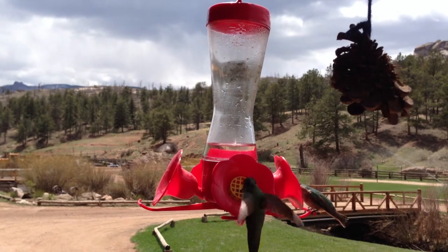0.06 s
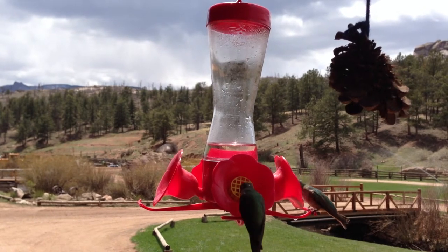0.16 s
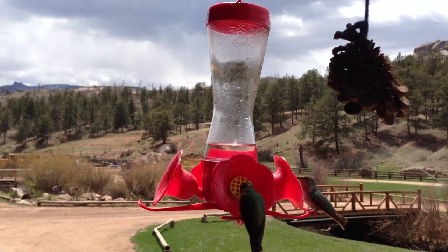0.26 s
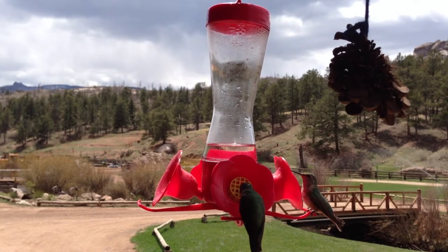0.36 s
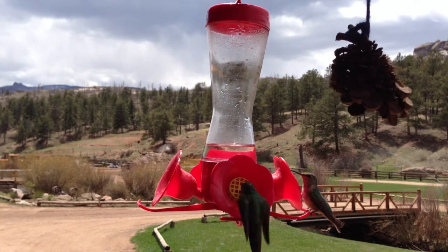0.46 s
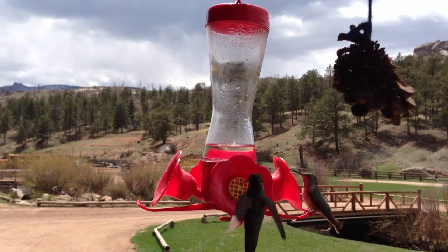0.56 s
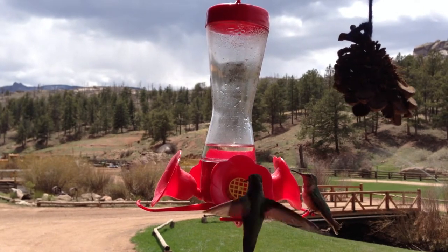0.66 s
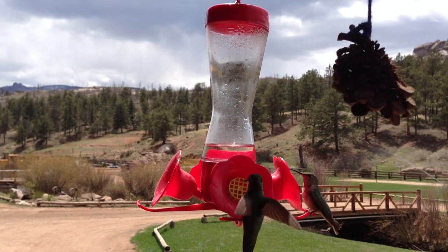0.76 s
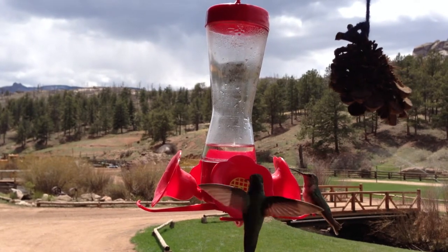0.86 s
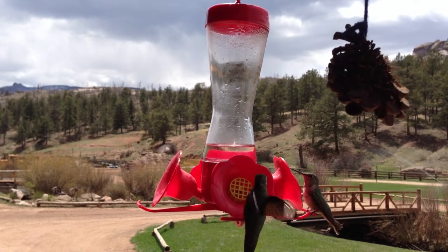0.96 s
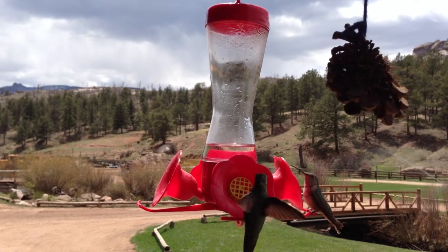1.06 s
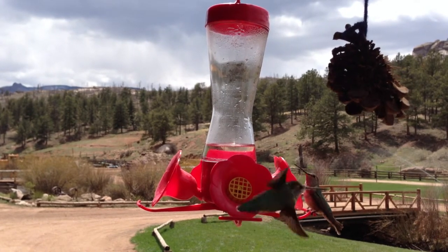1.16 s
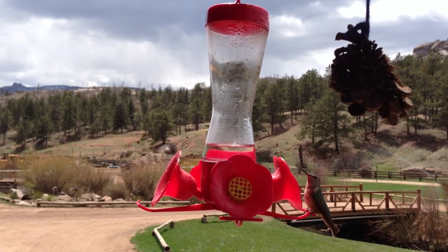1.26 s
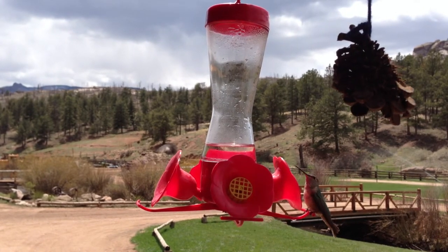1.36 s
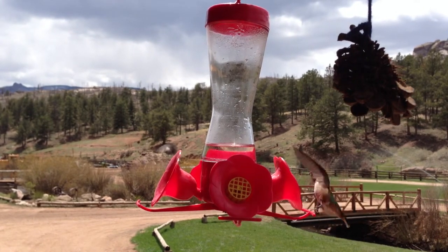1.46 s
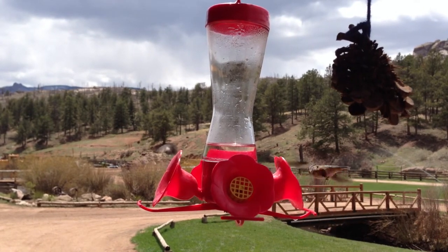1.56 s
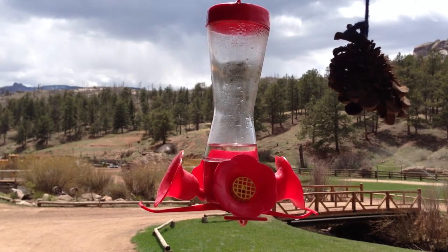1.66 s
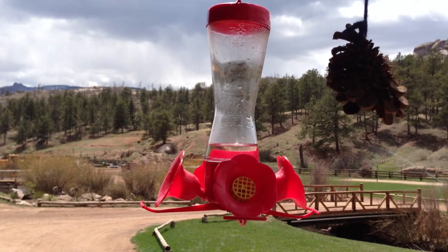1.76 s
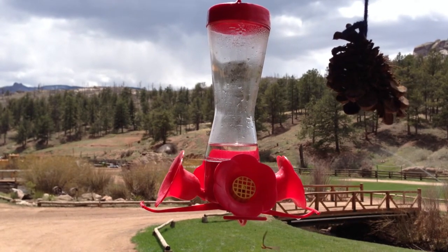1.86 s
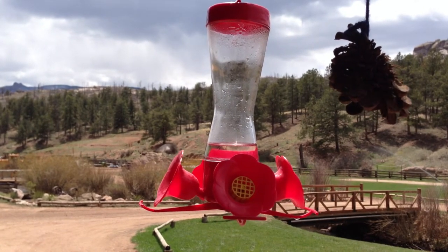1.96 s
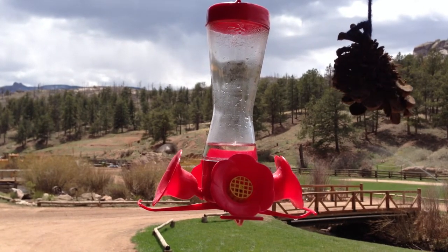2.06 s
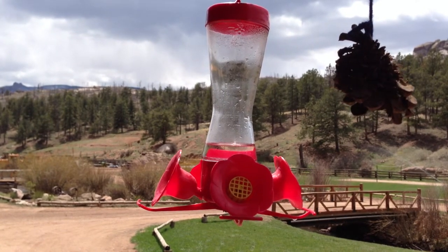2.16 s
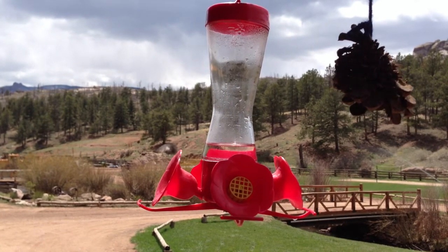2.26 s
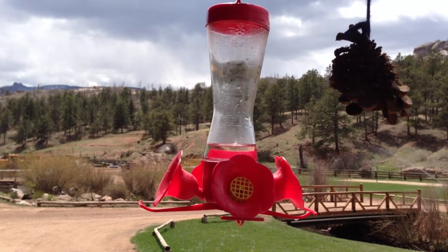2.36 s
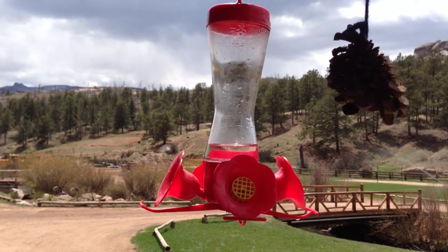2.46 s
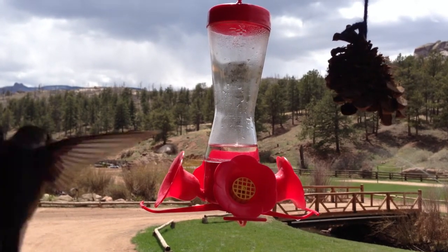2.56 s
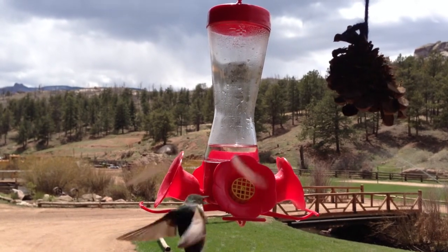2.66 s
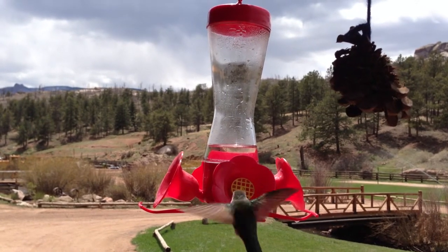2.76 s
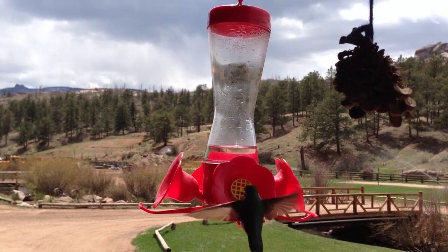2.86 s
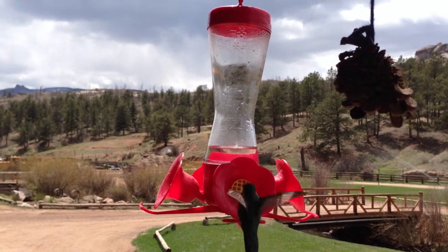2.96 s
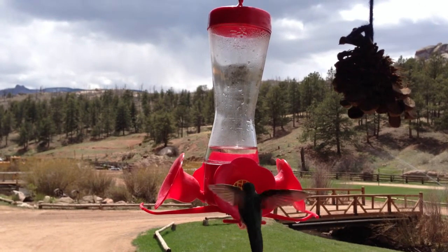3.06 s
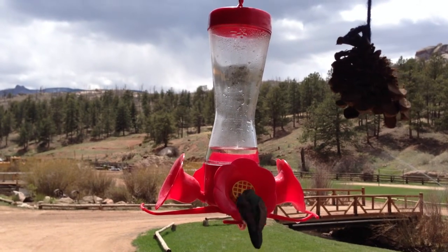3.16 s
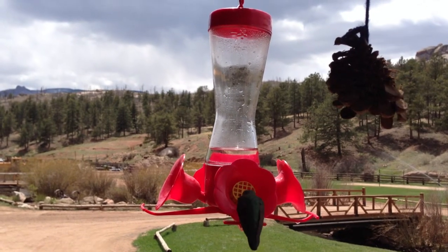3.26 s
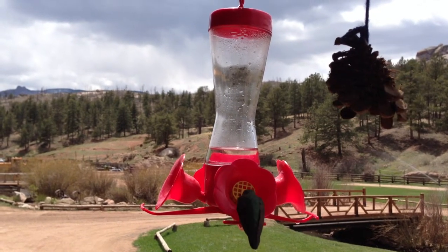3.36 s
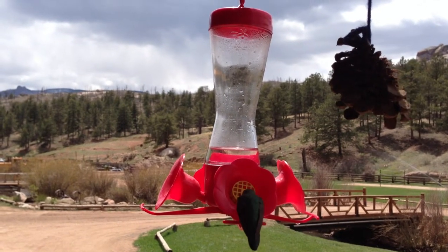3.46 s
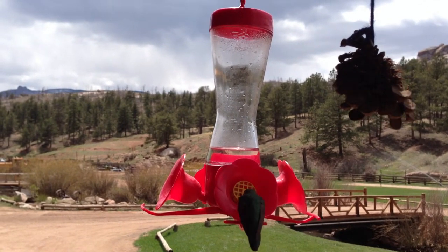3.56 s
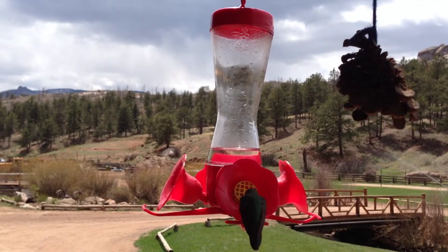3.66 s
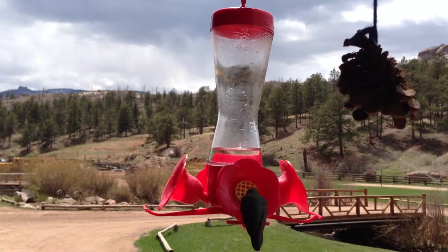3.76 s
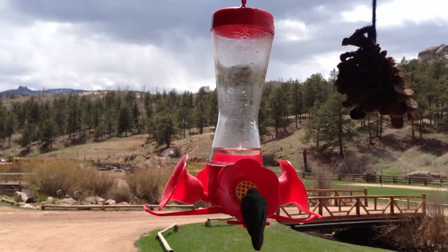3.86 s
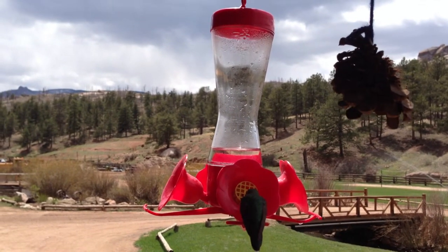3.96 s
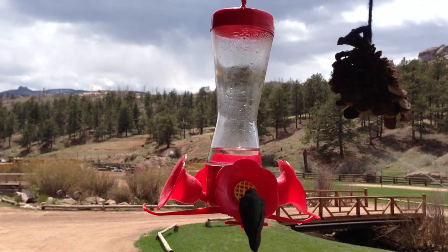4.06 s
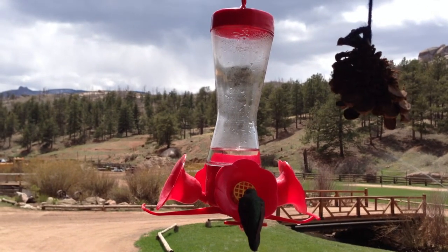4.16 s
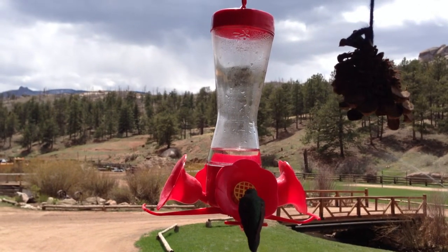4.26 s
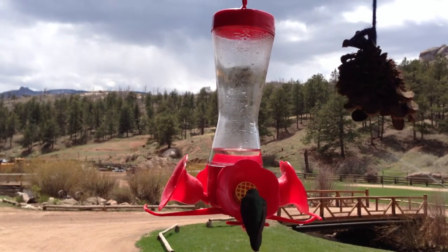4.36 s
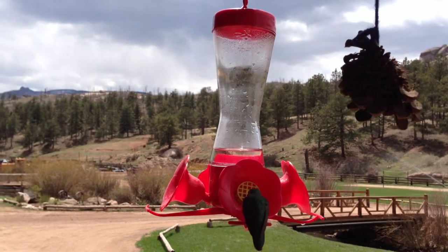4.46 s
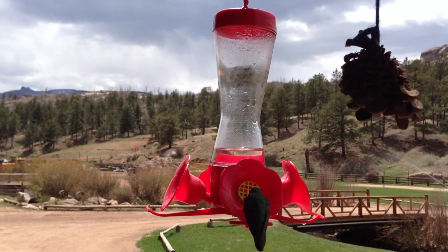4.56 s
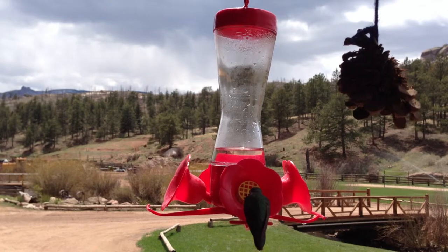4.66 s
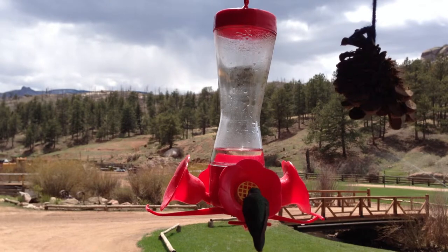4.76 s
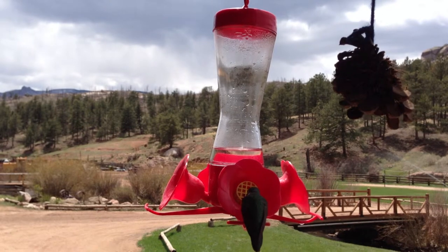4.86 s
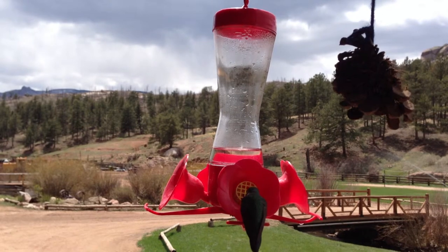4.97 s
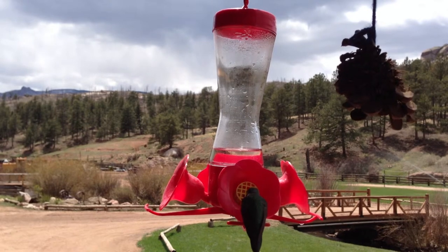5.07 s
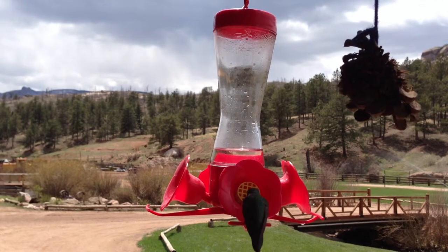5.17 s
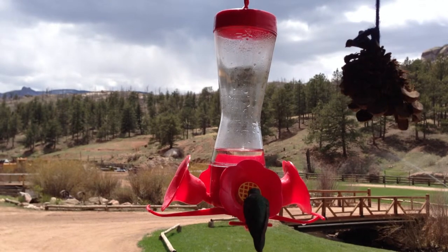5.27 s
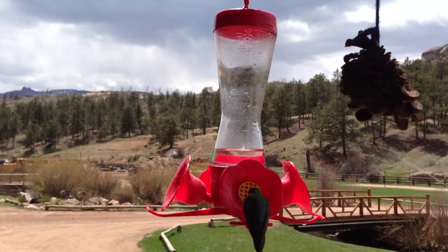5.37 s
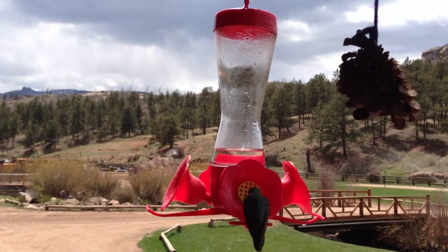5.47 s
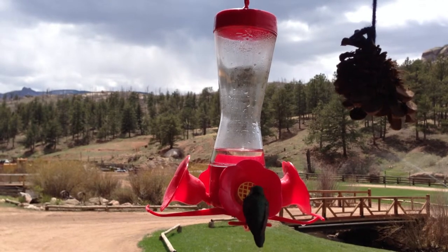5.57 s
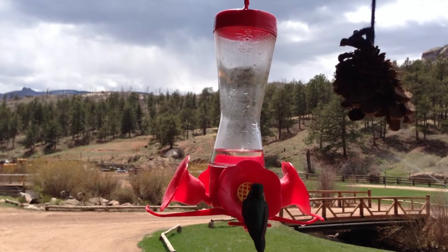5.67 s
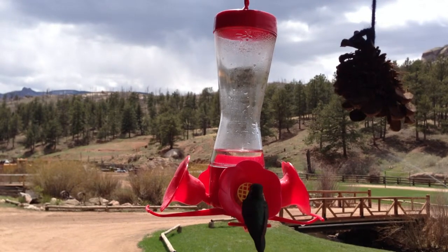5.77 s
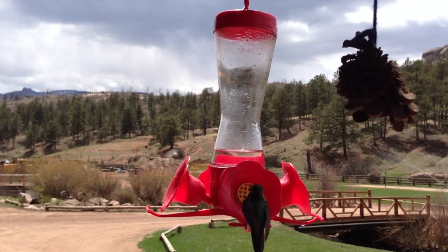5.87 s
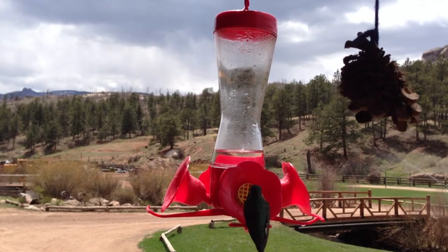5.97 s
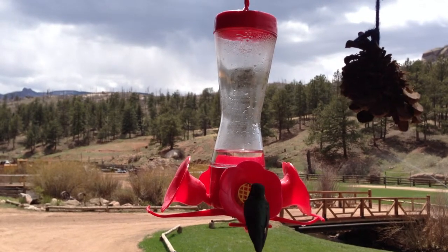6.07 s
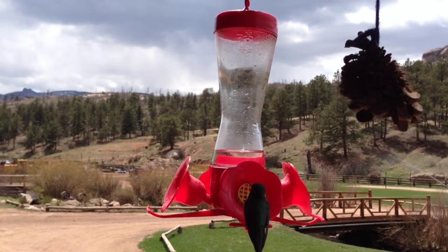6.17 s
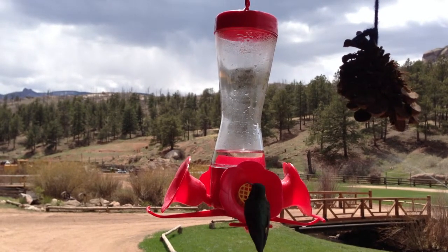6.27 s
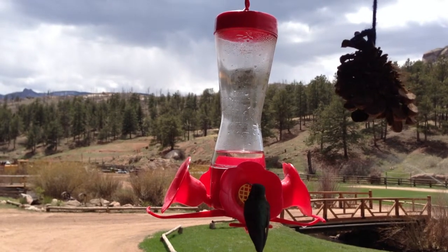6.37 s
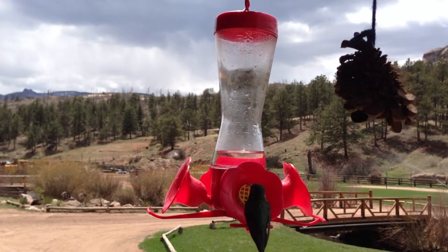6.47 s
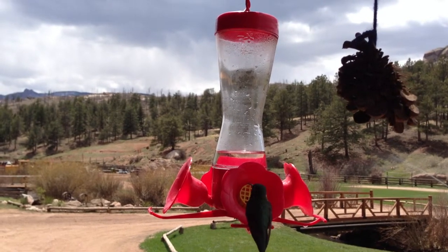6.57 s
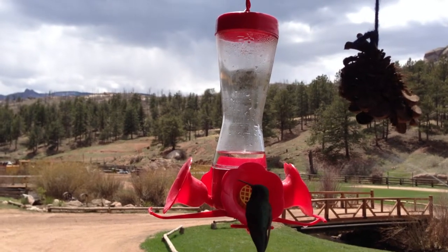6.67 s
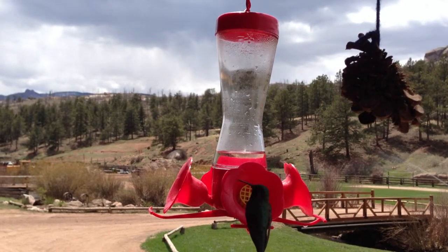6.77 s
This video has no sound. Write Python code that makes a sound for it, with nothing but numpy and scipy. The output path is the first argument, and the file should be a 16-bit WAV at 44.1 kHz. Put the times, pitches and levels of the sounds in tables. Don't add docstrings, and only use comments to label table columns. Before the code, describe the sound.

A small microphone close to a hummingbird feeder in open, wooded country picks up high rattling wing trills with low whirring beneath. Passes build to a take-off with a chip and hard tick, then a still louder landing flurry at under three seconds. Afterwards it is quiet: breeze, hiss, faint echoing chips and wavering trills of distant hummingbirds, one swelling nearer before fading.

```python
import sys
import numpy as np
from scipy import signal
from scipy.fft import rfft, irfft, next_fast_len
from scipy.io import wavfile
from scipy.ndimage import uniform_filter1d, minimum_filter1d

SR = 44100
rng = np.random.default_rng(int(sys.argv[2]) if len(sys.argv) > 2 else 0)


def voltage_ratio(level):
    return 10 ** (np.asarray(level, float) / 20)


def transcribe(signal):
    frames = np.atleast_2d(signal).T
    limited = np.clip(frames, -1, 1)
    pcm = np.round(limited * 32767).astype(np.int16)
    wavfile.write(sys.argv[1], SR, pcm)


N = 300299


def unit(x):
    return x / np.sqrt(np.mean(x ** 2) + 1e-20)


def curves(rows):
    s, *columns = np.transpose(rows)
    return [np.interp(np.arange(N) / SR, s, column) for column in columns]


def during(rows):
    t = np.arange(N) / SR
    return np.clip(np.minimum(t - rows[0][0], rows[-1][0] - t) * 50, 0, 1)


def swell(start_s, end_s, db, rise, fall):
    t = np.arange(N) / SR
    before_s = np.clip(start_s - t, 0, None)
    after_s = np.clip(t - end_s, 0, None)
    return voltage_ratio(db - rise * before_s - fall * after_s)


def filtered(x, response):
    m = next_fast_len(N + SR // 2)
    return irfft(rfft(x, m) * response(np.fft.rfftfreq(m, 1 / SR)), m)[:N]


def noise(spectrum):
    f, db = np.transpose(spectrum)

    def colour(hz):
        return voltage_ratio(np.interp(np.log(hz + 1), np.log(f), db, -120, -120))

    return unit(filtered(rng.standard_normal(N), colour))


def add(out, s, grain):
    i = round(s * SR) - len(grain) // 2
    piece = out[max(i, 0):i + len(grain)]
    piece += grain[max(-i, 0):][:len(piece)]


def echoes(x, t60, gap_s=0):
    t = np.arange(SR // 3) / SR
    tail = rng.standard_normal(len(t)) * voltage_ratio(-60 * t / t60) * (t >= gap_s)
    return signal.fftconvolve(x, tail / np.linalg.norm(tail))[:N]


def beats(first_s, rate, nearness, scatter_db):
    s, db = np.transpose(nearness)
    at = np.arange(first_s, s[-1], 1 / rate)
    late, size, *chance = rng.standard_normal((len(at), 4)).T
    return np.transpose([at + .001 * late, np.interp(at, s, db) + scatter_db * size, *chance])


def whistle(db, hz, ms, flutter, octave_db=-120, lead_db=-120):
    t = np.arange(-SR // 80, SR // 80) / SR
    u = t / (ms / 2000)
    envelope = 2. ** -np.where(u < 0, np.abs(u) ** 2.1, np.abs(u) ** 3.1)
    rough = np.interp(t, np.linspace(t[0], t[-1], 20), rng.standard_normal(20))
    phase = 2 * np.pi * np.cumsum(hz - 60 * np.clip(u, -3, 3) + 50 * flutter * rough) / SR
    shake_db = 2 * flutter * rough[::-1]
    tone = voltage_ratio(db + shake_db) * np.sin(phase) + voltage_ratio(octave_db) * np.sin(2 * phase)
    early = t + .0018
    scrape = np.convolve(rng.standard_normal(len(t)), np.hanning(44), 'same') / 4
    hiss = .12 * rng.standard_normal(len(t))
    chirp = (.5 + scrape) * np.sin(2 * np.pi * (7050 - 120000 * early) * early)
    lead = voltage_ratio(lead_db) * np.exp(-(early / 0.0012) ** 2) * (chirp + hiss)
    return envelope * tone + lead


def chip(start_hz, end_hz, overtone_db, fall_s, length_s):
    t = np.arange(SR // 40) / SR
    hz = end_hz - 40000 * t + (start_hz - end_hz) * np.exp(-t / fall_s)
    phase = 2 * np.pi * np.cumsum(hz) / SR
    envelope = np.clip(t / .0016, 0, 1) * voltage_ratio(-800 * t) * np.clip((length_s - t) / .003, 0, 1)
    tone = np.sin(phase) + voltage_ratio(overtone_db) * np.sin(2 * phase) + voltage_ratio(overtone_db - 7) * np.sin(3 * phase)
    return np.concatenate([0 * t, envelope * tone])


# (frequency [Hz], level [dB per Hz])
AIR_COLOUR = [(15, -69), (25, -33), (98, -8), (198, -7.5), (239, -0.5), (296, -3.5), (481, -4.5), (550, -6),
              (1450, -9.5), (1610, -8.5), (1890, -12.5), (5400, -16.5), (6340, -15), (6880, -18.5),
              (15400, -22)]
# (time [s], level [dB])
BREEZE = [(0.0, -67), (0.47, -65.5), (2.41, -67.5), (2.75, -65), (3.17, -67), (4.51, -66.5), (6.81, -67.5)]


def air():
    z = signal.stft(noise(AIR_COLOUR), nperseg=512)[2]
    field = uniform_filter1d(uniform_filter1d(rng.standard_normal(z.shape), 5, 0), 12, 1)
    low = np.exp(-np.arange(len(z)) / 25)[:, None]
    patchy_db = 2.2 * low * unit(field)
    wind = signal.istft(z * voltage_ratio(patchy_db), nperseg=512)[1][:N]
    return voltage_ratio(curves(BREEZE)[0] + 4.5) * wind


# (time [s], level [dB])
FAR_CHIPS = [(0, -70), (1.8, -63.5), (3.1, -64.5), (4, -62.5), (4.85, -68), (5.3, -67), (6.15, -69),
             (6.6, -66)]


def far_chips():
    out = np.zeros(N)
    t = np.arange(SR // 8) / SR
    for s in np.arange(.138, N / SR, .4273):
        db = np.interp(s, *np.transpose(FAR_CHIPS)) + .5 * rng.standard_normal()
        paths = rng.standard_normal(len(t)) * np.where(t < .04, 1, 0.28 * voltage_ratio(-60 * (t - .04) / 0.34))
        call = chip(6390, 3266, overtone_db=-11.5, fall_s=.0045, length_s=0.014)
        smear = np.convolve(call, paths / np.linalg.norm(paths))[SR // 40:]
        add(out, s, voltage_ratio(db + 12.5) * np.concatenate([0 * smear, smear]))
    return out


# (time [s], peak level [dB], pitch [Hz])
PEEPS = [
    (.155, -66, 3300),
    (.55, -64, 3150),
    (.583, -56, 3150),
]


def songbird():
    out = np.zeros(N)
    t = np.arange(SR // 8) / SR
    for s, db, hz in PEEPS:
        add(out, s, voltage_ratio(db - 517500 * (t - t.mean()) ** 2) * np.sin(2 * np.pi * hz * t))
    return out


# ((wingbeat [strokes/s], first pitch [Hz], last pitch [Hz], flutter [0-3], echo [dB]),
# nearness rows of (time [s], level [dB]))
FAR_BIRDS = [
    ((40.5, 5955, 5909, 1.2, -10), [(.01, -68), (.25, -64), (.45, -76), (.64, -75)]),
    ((42.5, 6175, 6208, 1.2, -8), [(3.02, -64), (3.35, -61.5), (3.6, -68), (4.18, -61), (4.45, -64), (4.9, -63.5)]),
    ((43.5, 6060, 6038, 1.1, -7), [(4.912, -64.5), (5.03, -54.5), (5.12, -61), (5.23, -55.5), (5.34, -62)]),
    ((44, 6200, 6292, 1.3, -11), [(5.35, -68), (5.5, -66), (5.7, -75)]),
    ((48.5, 6155, 6084, 0.95, -11), [(5.718, -51.5), (5.81, -48), (5.92, -55.5), (6.05, -55)]),
    ((47.5, 6280, 6046, 0.1, -13), [(6.06, -59), (6.25, -59.5), (6.42, -56), (6.62, -58), (6.8, -73)]),
]


def far_trill():
    out, sent = np.zeros((2, N))
    for (rate, first_hz, last_hz, flutter, echo_db), nearness in FAR_BIRDS:
        middle = len(nearness) // 2
        halves = nearness[:middle + 1], nearness[middle:]
        strokes = np.concatenate([beats(half[0][0], rate, half, scatter_db=0.7) for half in halves])
        for s, db, pitch, _ in strokes:
            hz = np.interp(s, [nearness[0][0], nearness[-1][0]], [first_hz, last_hz])
            stroke = whistle(db, hz + 40 * flutter * pitch, 4.8, flutter)
            add(out, s, stroke)
            add(sent, s, voltage_ratio(echo_db) * stroke)
    return out + echoes(sent, t60=0.11, gap_s=0.00082)


# (time [s], peak level [dB])
DOWNWASH = [
    (2.601, -50),
    (2.626, -49),
    (2.775, -59),
]


def downwash():
    out = np.zeros(N)
    t = np.arange(-SR // 20, SR // 20) / SR
    for s, db in DOWNWASH:
        add(out, s, voltage_ratio(db) * np.exp(-(t / .011) ** 2) * np.sin(2 * np.pi * 88 * t))
    return out


# (time [s], peak level [dB])
TAPS = [
    (1.4215, -26),
    (2.594, -48),
    (1.326, -50),
    (1.351, -51),
]
# (frequency [Hz], width [Hz], level [dB])
PERCH = [
    (800, 1500, 2),
    (4200, 3600, -5),
    (11000, 7000, -13),
]


def perch():
    blows = np.zeros(N)
    for s, db in TAPS:
        rattle = rng.standard_normal(90) * voltage_ratio(-15 - np.arange(90) * .35)
        rattle[0] = 1
        add(blows, s, voltage_ratio(db + 6) * np.concatenate([0 * rattle, rattle]))

    def plastic(f):
        total = 0
        for k, (centre, width, db) in enumerate(PERCH):
            band = 1j * f * width / (centre * centre - f * f + 1j * f * width)
            total = total + (-1) ** k * voltage_ratio(db) * band
        return total

    return filtered(blows, plastic)


# (time [s], level [dB], start pitch [Hz], end pitch [Hz])
NEAR_CHIP = [
    (1.3718, -33, 6100, 4150),
]


def near_chip():
    out = np.zeros(N)
    for s, db, start_hz, end_hz in NEAR_CHIP:
        add(out, s, voltage_ratio(db) * chip(start_hz, end_hz, overtone_db=-20, fall_s=.0034, length_s=.021))
    return out + voltage_ratio(-18) * echoes(out, t60=0.16, gap_s=.006)


# (time [s], pitch [Hz], level [dB])
DRONE = [
    [(1.3, 169.6, -53), (1.328, 172, -64), (1.38, 168, -48), (1.46, 163, -74)],
    [(1.5, 156.7, -69), (1.518, 156.3, -60), (1.558, 157.7, -70), (1.642, 161, -47), (1.8, 169.5, -66)],
]


def drone():
    out = np.zeros(N)
    for rows in DRONE:
        hz, db = curves(rows)
        out += during(rows) * voltage_ratio(db + 1.0) * np.sin(2 * np.pi * np.cumsum(hz) / SR)
    return out


# (first time [s], last time [s], wingbeat [strokes/s])
HOVERS = [
    (1.2494, 1.42, 42.5),
    (1.7996, 2.385, 39.76),
    (2.9075, 3.02, 46),
]
# (first level [dB], last level [dB])
HOVER_DB = [(-49, -52), (-51, -46), (-53, -48)]
# (from [s], to [s], stirred air level [dB], feather rustle level [dB])
BOUTS = [
    (1.303, 1.424, -59, -63.5),
    (1.566, 1.747, -54, -64.5),
    (1.836, 2.47, -63, -70),
    (2.6, 2.821, -54.5, -60),
    (2.89, 3.02, -67.5, -72.5),
]
# (frequency [Hz], level [dB per Hz])
HUM = [(60, -24), (90, -49), (130, -3.5), (165, -2), (220, -11.5), (330, -9.5), (500, -25.5), (800, -25)]
# (frequency [Hz], level [dB per Hz])
RUSTLE = [(300, -3), (700, -12), (1800, -10), (3000, -16.5), (8000, -12.5), (15000, -23)]


def wing_hum():
    out, gate = np.zeros((2, N))
    t = np.arange(-SR // 20, SR // 20) / SR
    pushes = [(row[0] + 0.00447, row[4]) for row in LEAVING + ARRIVING]
    for (first_s, last_s, rate), (first_db, last_db) in zip(HOVERS, HOVER_DB):
        nearness = [(first_s, first_db), (last_s, last_db)]
        pushes += [row[:2] for row in beats(first_s, rate, nearness, scatter_db=0.5)]
    for s, db in pushes:
        hz = 209.5 * np.exp(.09 * rng.standard_normal())
        puff = np.exp(-(t * hz / 0.49) ** 2 / 2) * np.sin(2 * np.pi * hz * t - 1.2)
        snap = 0.28 * np.exp(-(t / 0.0028) ** 2) * np.sin(2 * np.pi * 400 * t)
        ring = voltage_ratio(-3.5 - 60 * t / 0.056) * np.clip(t / 0.0052, 0, 1) * np.sin(2 * np.pi * 166 * t)
        add(out, s, voltage_ratio(db - 2.0) * (puff + ring + snap))
        add(gate, s - .003, np.exp(-(t / .006) ** 2))
    hum = sum(swell(start, end, db, rise=252, fall=193) for start, end, db, _ in BOUTS)
    rustle = sum(swell(start, end, db, rise=252, fall=193) for start, end, _, db in BOUTS)
    return out + hum * noise(HUM) + rustle * (.45 + gate) * noise(RUSTLE)


# (time [s], whistle level [dB], pitch [Hz], length [ms], push of air level [dB])
LEAVING = [(1.4956, -46.5, 5970, 2.4, -56), (1.5205, -45.5, 6000, 4.7, -41), (1.546, -52, 6060, 3.3, -47),
           (1.571, -30.5, 6130, 3.7, -39.5), (1.5961, -31, 6320, 3, -35.5), (1.6205, -32, 6500, 1.7, -41.5),
           (1.6435, -32.5, 6550, 4.9, -37), (1.6677, -22.5, 6230, 4.5, -39), (1.694, -44, 6300, 1.9, -53),
           (1.7182, -29, 6270, 4.2, -41), (1.7447, -34.5, 6190, 2.3, -50), (1.7692, -21, 6340, 3.6, -36),
           (1.7897, -39, 6160, 2.7, -70), (1.8717, -39.5, 6190, 1.7, -73)]
# (time [s], whistle level [dB], pitch [Hz], length [ms], push of air level [dB])
ARRIVING = [(2.4238, -29, 6280, 4.4, -48), (2.448, -29.5, 6390, 3.3, -48.5), (2.473, -35, 6270, 3.3, -53),
            (2.4971, -36.5, 6300, 3.7, -49), (2.521, -54, 6190, 2.8, -52), (2.595, -48, 6190, 3.3, -34),
            (2.6186, -22, 5980, 4.6, -33.5), (2.6428, -13, 6010, 2.25, -33), (2.656, -31, 6700, 1.6, -70),
            (2.6672, -38, 6120, 5.6, -34), (2.6922, -19.5, 6090, 2.9, -32.5), (2.7135, -40, 6220, 3, -53),
            (2.743, -31, 6300, 1.9, -42), (2.765, -23, 5990, 4.8, -40), (2.7891, -22.5, 6050, 4.4, -45),
            (2.8127, -49, 6190, 3.0, -52), (2.8362, -26, 6090, 2.9, -61), (2.858, -37, 6600, 2.2, -53),
            (2.882, -35, 6170, 1.9, -47), (2.905, -48, 6300, 2.5, -70), (2.9269, -43, 6000, 2.1, -68),
            (2.969, -57, 6290, 2.2, -69)]
# (time [s], octave under the whistle [dB], lead-in chirp of the next feather [dB])
FACING = [(.7, -37, -84), (1.4, -35, -66), (1.63, -31, -44), (1.68, -33, -51), (2.36, -24, -66),
          (2.43, -19, -50), (2.58, -21, -65), (2.643, -40, -32.5), (2.7, -32, -48)]
# (first stroke [s], wingbeat [strokes/s], pitch [Hz], whistle length [ms])
PASSES = [
    (.6565, 40.4, 6300, 3.8),
    (.8284, 42.8, 6290, 3.2),
    (.7903, 42.12, 6080, 4.8),
    (1.2805, 40.5, 6400, 5),
    (1.2947, 43, 6150, 4.6),
    (1.9447, 46.2, 6320, 4.6),
    (2.1475, 44.8, 6130, 2.7),
]
# (time [s], whistle level [dB])
NEARNESS = [
    [(.65, -54), (.685, -56), (.715, -32.5), (.77, -48), (.81, -35)],
    [(.828, -36.5), (.9, -41), (1.0, -39), (1.04, -36), (1.1, -47)],
    [(.79, -50), (.909, -36), (.935, -40), (.957, -37.5), (1.0, -48), (1.027, -31), (1.075, -40),
     (1.11, -45)],
    [(1.28, -48), (1.33, -39), (1.36, -48)],
    [(1.29, -39.5), (1.34, -50), (1.37, -38)],
    [(1.94, -49), (2.04, -44.5), (2.14, -41)],
    [(2.147, -39), (2.2, -48), (2.27, -50), (2.41, -46)],
]
# (from [s], to [s], level [dB], rise [dB/s], fall [dB/s])
SCATTER = [
    (0.754, 1.03, -52.5, 170, 100),
    (.97, 1.005, -50.5, 58, 106),
    (1.313, 1.31, -54.5, 600, 76),
    (1.744, 2.8, -60, 44, 68),
    (2.036, 2.12, -56, 34, 35),
    (2.243, 2.366, -57, 44, 31),
    (5.745, 5.85, -64, 400, 50),
    (6.3, 6.418, -67, 33, 38),
]
SCATTER_SHIFT_HZ = [30, 0, 60, 0, 120, -90, 60, 30]
# (frequency [Hz], level [dB per Hz])
FEATHER = [(5400, -40), (5800, -17), (6020, -2), (6330, -2), (6530, -12), (6850, -34)]


def near_trill():
    out = np.zeros(N)
    octave_db, lead_db = curves(FACING)
    strokes = [(*row[:4], 1) for row in LEAVING + ARRIVING]
    for (first_s, rate, hz, ms), nearness in zip(PASSES, NEARNESS):
        for s, db, a, b in beats(first_s, rate, nearness, scatter_db=2.2):
            strokes.append((s, db, hz + 39 * a, ms * voltage_ratio(0.88 * b), 0.78))
    for s, db, hz, ms, flutter in strokes:
        i = round(s * SR)
        a, b = rng.standard_normal(2)
        weak = min(db + 35.5, 0)
        add(out, s, whistle(db, hz, ms, flutter, db + octave_db[i] + a, lead_db[i] + weak + 2 * b))
    blur = np.zeros(N)
    for row, shift_hz in zip(SCATTER, SCATTER_SHIFT_HZ):
        blur += swell(*row) * noise(np.add(FEATHER, [shift_hz, 0]))
    return out + voltage_ratio(-20.0) * echoes(out, t60=0.21, gap_s=0.00068) + blur


def scene():
    background = air() + far_chips() + songbird() + far_trill()
    feeder = downwash() + perch() + near_chip() + drone() + wing_hum() + near_trill()
    return (background + feeder)[None]


def masked(x, under_db, slope_db):
    hz, _, z = signal.stft(x, SR, nperseg=1024)
    power = uniform_filter1d(uniform_filter1d(np.abs(z) ** 2, 9, 0), 2, 1)
    level_db = 10 * np.log10(np.abs(power) + 1e-20)
    whistle_db = minimum_filter1d(level_db[(hz > 5700) & (hz < 6600)].max(0), size=3)
    mask_db = whistle_db - under_db - slope_db * (hz[:, None] - 7000) / 1000
    audible = (level_db > mask_db) | (hz[:, None] < 6950)
    return signal.istft(z * audible, SR, nperseg=1024)[1][:N]


def band_limit(x):
    return signal.sosfilt(signal.butter(12, 15630, fs=SR, output="sos"), x)


def record(dry):
    limited = filtered(dry[0], lambda hz: hz < 15440)
    heard = masked(limited, under_db=32.0, slope_db=3.0)
    return band_limit(heard[None])


dry = scene()
out = record(dry)
transcribe(out)
```